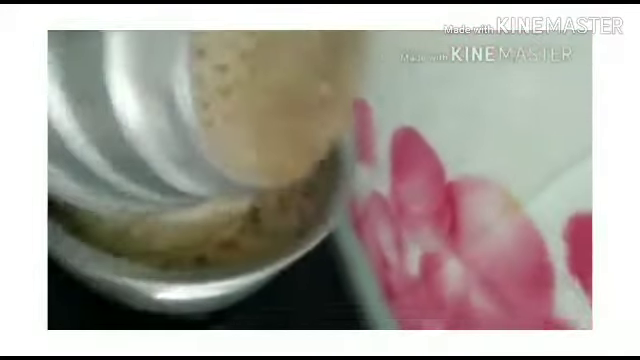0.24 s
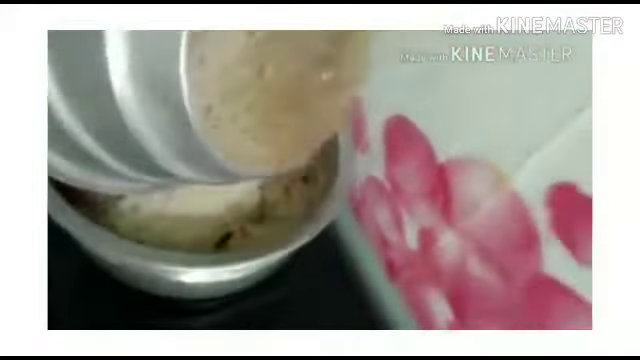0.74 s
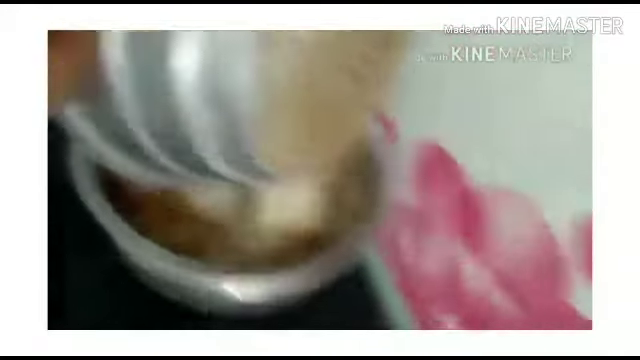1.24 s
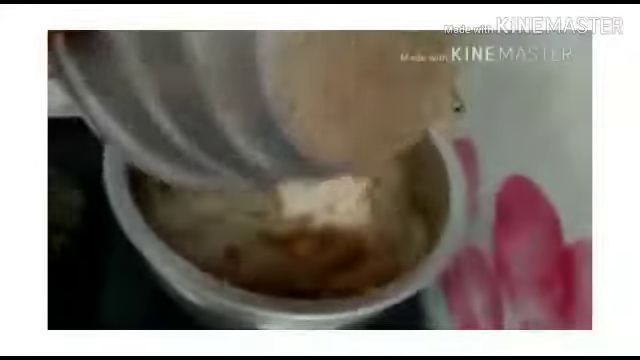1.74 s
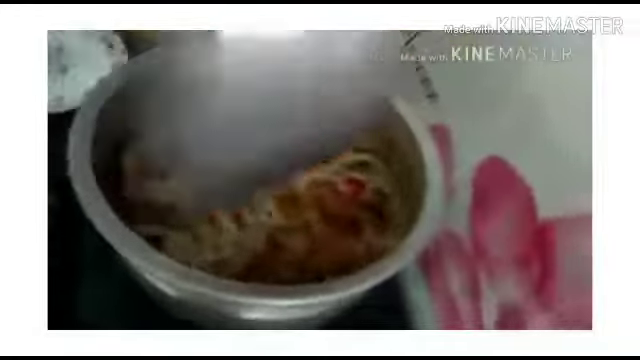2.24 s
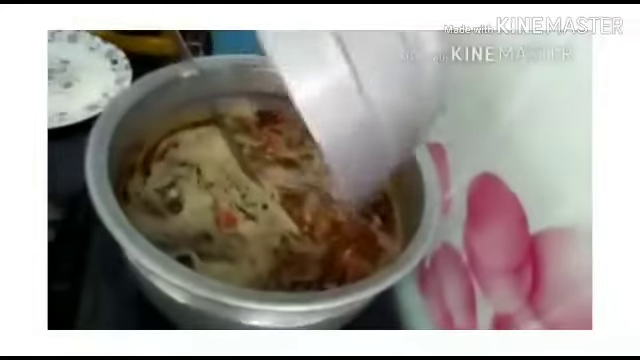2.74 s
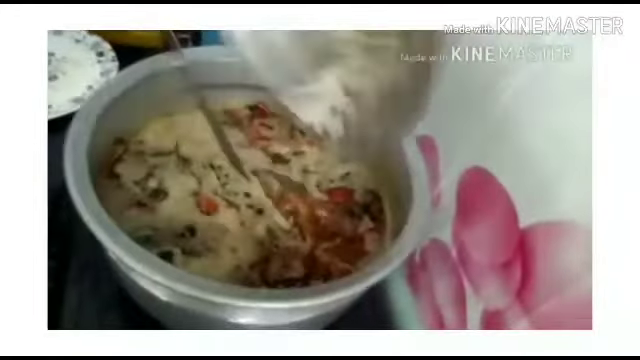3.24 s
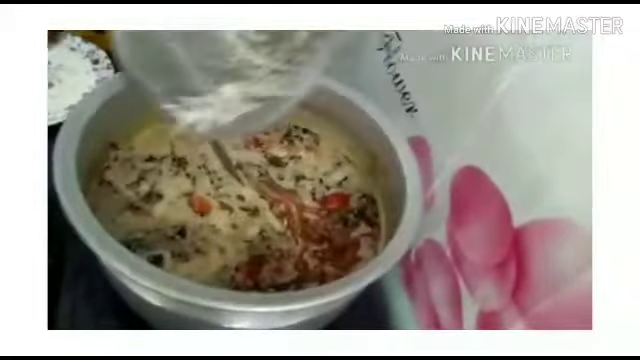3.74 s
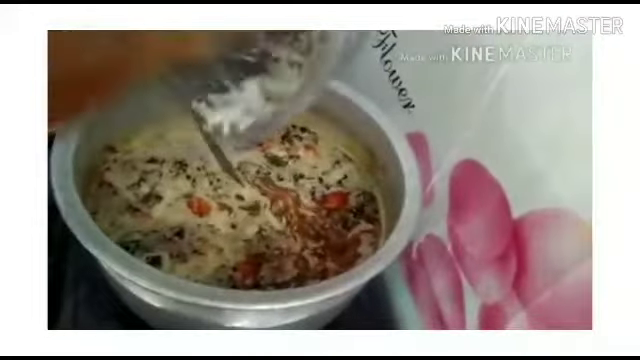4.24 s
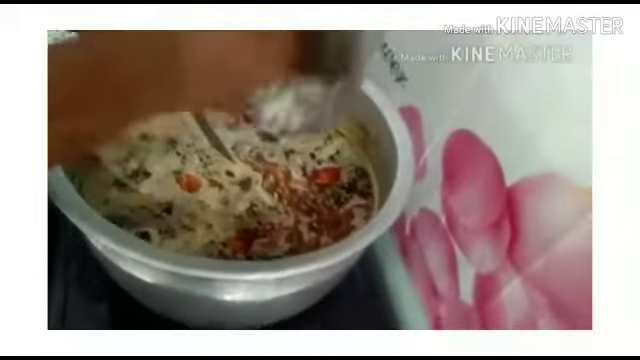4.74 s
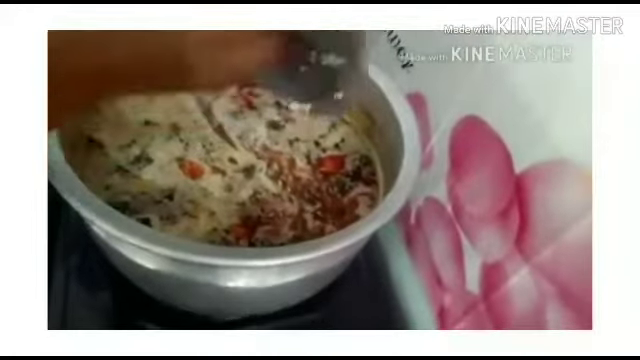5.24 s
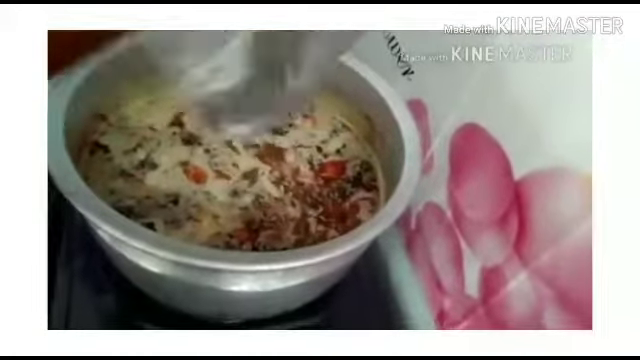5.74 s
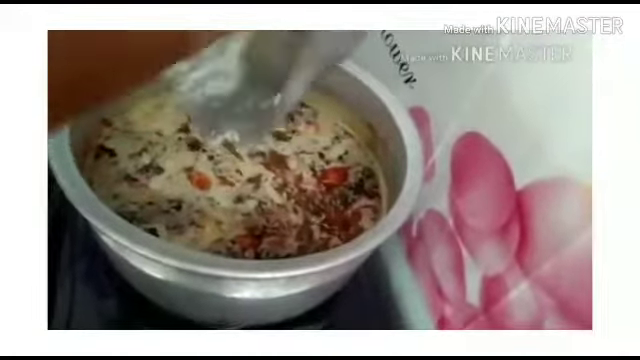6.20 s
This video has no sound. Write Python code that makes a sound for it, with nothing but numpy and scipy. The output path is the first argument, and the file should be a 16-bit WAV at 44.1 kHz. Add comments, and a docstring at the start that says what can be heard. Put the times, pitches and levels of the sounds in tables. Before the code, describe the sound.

In a small hard-walled kitchen, very close, wet rice hisses down a tub while the tub knocks twice on a metal pot. Rice slumps into broth with soft, hollow, wavering booms and a short scrape. Four loud clanking knocks follow with bursts of sliding rice. After a near-quiet pause come light finger taps, grain ticks and hand sweeps. A phone microphone picks it up, brighter on the right, over a faint simmering rush.

```python
"""In a small kitchen, close to a phone, soaked rice is emptied from a tub into an aluminium pot of hot broth.
Knocks on the rim are bursts of contact noise played through resonances of the tub and the pot.
Sliding rice, a scrape and a hand's sweeps are dense random clicks, coloured as hiss and rasp, with drifting echoes.
Slumps into the broth are soft click noise and slowly wavering resonances; fizz and a faint rush lie behind.
The right microphone faces the pot; the left one is shaded and hears it duller."""
import sys
import numpy as np
from scipy import signal
from scipy.fft import rfft, irfft
from scipy.io import wavfile
from scipy.ndimage import uniform_filter1d

SR = 44100
rng = np.random.default_rng(int(sys.argv[2]) if len(sys.argv) > 2 else 0)


def int16_out(signal):
    """Quantize to a 16-bit WAV file."""
    q = np.round(np.clip(np.atleast_2d(signal).T, -1, 1) * 32767)
    wavfile.write(sys.argv[1], SR, q.astype(np.int16))


N = 285327
TIME = np.arange(N) / SR


def undb(db):
    """Decibels to gain."""
    return 10 ** (np.asarray(db) / 20)


def unit(x):
    """Scale to an rms of 1."""
    return x / np.sqrt(np.mean(x ** 2))


def norm(x):
    """Scale a response to an energy of 1."""
    return x / np.sqrt(np.sum(x ** 2, axis=-1, keepdims=True))


def add(out, s, x):
    """Mix x in at time s."""
    i = max(int(s * SR), 0)
    out[..., i:i + x.shape[-1]] += x[..., :N - i]


def through(x, response):
    """Play x through a response; rows are microphones."""
    return signal.fftconvolve(np.atleast_2d(x), np.atleast_2d(response), axes=-1)[:, :N]


def butter(x, order, hz, kind):
    """Butterworth filter."""
    return signal.sosfilt(signal.butter(order, hz, kind, fs=SR, output="sos"), x)


def band(x, low_hz, high_hz, order=3):
    """Steep band-pass."""
    return butter(x, order, [low_hz, min(high_hz, SR / 2 - 1)], "band")


def colour(points, size=4096):
    """Causal response with the given spectrum, points of (pitch_hz, level_db)."""
    hz, db = np.transpose(points)
    f = np.maximum(np.fft.rfftfreq(size, 1 / SR), 1)
    level_db = np.interp(np.log(f), np.log(hz), db)
    # folding the cepstrum onto positive times gives minimum phase
    cepstrum = irfft(np.log(undb(level_db)))
    cepstrum[1:size // 2] *= 2
    cepstrum[size // 2 + 1:] = 0
    return irfft(np.exp(rfft(cepstrum)))


def fade(t, t60):
    """Exponential decay that loses 60 dB in t60 seconds."""
    return np.exp(-np.log(1000) * t / t60)


def swell(start_s, hold_s, attack_s, release_s):
    """Rise before start_s, hold, fall; the slopes are timed over 20 dB."""
    before = np.maximum(start_s - TIME, 0) / attack_s
    after = np.maximum(TIME - start_s - hold_s, 0) / release_s
    return undb(-20 * (before + after))


def together(gains):
    """Joint gain of unrelated noises: their powers add."""
    return np.sqrt(sum(g ** 2 for g in gains))


def walk(rate):
    """Smooth chance with a spread near 1, rate new values per second."""
    knots = rng.standard_normal(int(N / SR * rate) + 2)
    return np.interp(TIME * rate, np.arange(len(knots)), knots)


def grains(rate, spread_db, apart):
    """Dense clicks of uneven size; each reaches the two microphones with its own strength."""
    size = undb(spread_db * np.minimum(rng.exponential(size=N), 5))
    clicks = (rng.random(N) < rate / SR) * size
    return unit(clicks * (rng.standard_normal(N) + apart * rng.standard_normal((2, N))))


def chatter(apart=0.79, size=4096):
    """Micro-contacts, random in time, even in spectrum; each microphone adds its own part above the bass."""
    x = irfft(np.exp(2j * np.pi * rng.random((3, size // 2 + 1))))
    own = butter(x[1:], 1, 600, "high")
    return unit(x[0] + apart * own)


# spectrum of the faint rush in the kitchen: pitch_hz [Hz], level_db [dB, relative]
RUSH_SPECTRUM = [(30, 6.5), (110, 1.5), (300, 0), (420, -8.5), (520, 5), (700, -6.5), (1050, -8),
                 (2000, -16.5), (5000, -21), (8500, -16.5), (15000, -29.5)]
KITCHEN_DB = -65.5


def kitchen():
    """Faint rush of the stove and the simmering pot: coloured noise whose level strays a little."""
    noise = rng.standard_normal(N) + .8 * rng.standard_normal((2, N))
    air = through(noise, norm(colour(RUSH_SPECTRUM)))
    return unit(air) * undb(KITCHEN_DB + 1.2 * walk(3.4))


def room(x, t60=0.37, build_s=0.0075, shared_hz=600):
    """Dense reflections of close hard walls: decaying noise; both microphones get the same bass."""
    t = TIME[:SR // 2]
    noise = rng.standard_normal((2, len(t)))
    bass = signal.sosfiltfilt(signal.butter(2, shared_hz, fs=SR, output="sos"), noise)
    reflections = noise - bass + bass[1]
    tail = norm(reflections * fade(t, t60) * (1 - np.exp(-t / build_s)))
    walls = [(100, 6), (300, 0.5), (700, 4.0), (1200, 6.0), (3500, -10.5), (8000, -4.0), (15000, -7.5)]
    return through(through(x, tail), colour(walls))


# the grip shifts: start_s [s, start of the hold], hold_s [s], level_db [dB]
GRIP_SHIFTS = [(0.571, 0.21, -56.5), (5.56, 0.055, -61.5)]


def handling(attack_s=.08, release_s=0.27):
    """Dull rumble as the grip shifts: noise with little left above the bass."""
    dull = colour([(25, -3.5), (60, -5), (90, -1.5), (200, -27), (600, -52)])
    rumble = through(rng.standard_normal((2, N)), dull)
    return unit(rumble) * together(undb(db) * swell(s, hold, attack_s, release_s) for s, hold, db in GRIP_SHIFTS)


# wet rice meets the hot broth: start_s [s, start of the hold], hold_s [s], level_db [dB, before a common trim]
FIZZES = [(0.756, 0.0083, -30), (1.43, .43, -47)]


def fizz(attack_s=0.06, release_s=.05):
    """Tiny bubbles bursting on the hot surface: dense clicks in a high band."""
    bubbles = band(grains(rate=6000, spread_db=2, apart=1), 12000, 15000, order=2)
    bursting = together(undb(db) * swell(s, hold, attack_s, release_s) for s, hold, db in FIZZES)
    return undb(-7.5) * unit(bubbles) * bursting


def wavering(hz, width_hz):
    """A resonance stirred at random: strength and phase stray, the faster the wider it is."""
    phase = 2 * np.pi * np.cumsum(hz * np.ones(N)) / SR
    clock = np.cumsum(width_hz * np.ones(N)) / SR
    a, b = (np.interp(clock, np.arange(len(k)), k) for k in rng.standard_normal(size=(2, 4096)))
    return unit(a * np.cos(phase) + b * np.sin(phase))


# tub knocked on the rim: start_s [s, the blow], blow_db [dB], rebound_db [dB re blow],
# scuff_db [dB re blow, before it], bass_db [dB, the thump], brightness_db [dB at 8 kHz], room_db [dB, room send]
RIM_KNOCKS = [(0.1239, -9.5, -17.5, -11, 1.5, -8, -14.5), (0.3091, -7, -24.5, -25, -5.5, 3.5, -12.5),
              (1.889, -12, -17.5, -14, -12.5, -2.5, -0.5), (2.597, -4.5, -16.5, -9, -4, 0.5, 3),
              (2.829, -7.5, -17.5, -22, -3, 3, 1.5), (3.0216, -6.5, -9.5, -11, -3, -2, -1),
              (3.2242, -6, -18, -40, -7, 1, -4)]
# masses of rice slump into the broth: start_s [s, start of the hold], hold_s [s],
# boom_db [dB], slosh_db [dB], both before the trims in slump()
RICE_SLUMPS = [(1.337, 0.037, -52.5, -52), (1.38, 0.046, -46, -48.5), (1.809, 0.056, -45, -65),
               (1.885, .17, -40, -46), (2.141, 0.16, -42.5, -58.5), (2.44, 0.25, -48.5, -58.5)]
# pitch of the air between tub and pot: start_s [s], pitch_hz [Hz]
AIR_PITCH = [(1.32, 340), (1.42, 265), (1.8, 200), (1.9, 251.8), (2.06, 254.9), (2.18, 285), (2.4, 292),
             (2.7, 270)]
# the boom gets purer as the tub empties: start_s [s], width_hz [Hz]
AIR_WIDTH = [(1.4, 155.3), (1.8, 59.9), (2.5, 60.47), (2.72, 21.8)]
# spectrum of the slosh: pitch_hz [Hz], level_db [dB, relative]
SLOSH_SPECTRUM = [(40, -32), (130, -7.5), (220, 4), (380, 2.5), (520, -3.5), (750, -11), (1050, -6.5),
                  (1400, -19.5), (2600, -22), (8000, -33.5)]
SLUMP_ATTACK_S, SLUMP_RELEASE_S = 0.055, 0.16  # time to rise and to fall by 20 dB
FILLED_S = 2.5  # knocks after this make the air boom too
KNOCK_BOOM_DB = -36  # relative to the blow, before the trim in slump()
KNOCK_BOOM_HOLD_S, KNOCK_BOOM_ATTACK_S, KNOCK_BOOM_RELEASE_S = .1, .02, .11
# a deeper resonance of the broth, stirred only by the slumps; its level is relative to the boom
LOW_BOOM_HZ, LOW_BOOM_WIDTH_HZ, LOW_BOOM_DB = 188, 27, -8.5


def slump():
    """Rice sinks into the broth with a soft slosh; the air between tub and pot booms at a wavering pitch."""
    falls = [(swell(s, hold, SLUMP_ATTACK_S, SLUMP_RELEASE_S), boom_db, slosh_db)
             for s, hold, boom_db, slosh_db in RICE_SLUMPS]
    stirred = together(shape * undb(db) for shape, db, _ in falls)
    sloshing = together(shape * undb(db) for shape, _, db in falls)
    knocked = together(
        undb(db + KNOCK_BOOM_DB) * swell(s, KNOCK_BOOM_HOLD_S, KNOCK_BOOM_ATTACK_S, KNOCK_BOOM_RELEASE_S)
        for s, db, *_ in RIM_KNOCKS if s > FILLED_S)
    pitch_hz = np.interp(TIME, *np.transpose(AIR_PITCH))
    width_hz = np.interp(TIME, *np.transpose(AIR_WIDTH))
    boom = wavering(pitch_hz, width_hz) * together([stirred, knocked])
    low_boom = undb(LOW_BOOM_DB) * wavering(LOW_BOOM_HZ, LOW_BOOM_WIDTH_HZ) * stirred
    slosh = through(grains(rate=2600, spread_db=0.0, apart=0.3), norm(colour(SLOSH_SPECTRUM)))
    return undb(3.0) * (boom + low_boom) + undb(5.5) * slosh * sloshing


# single grains and clumps snap against the wall: start_s [s, the sharp onset], level_db [dB], pitch_hz [Hz, centre]
GRAIN_SNAPS = [(0.21, -24, 8540), (0.5422, -34, 8240), (0.579, -41.5, 7100), (0.601, -39, 7140),
               (3.5407, -19.5, 7700), (3.6137, -34.5, 8960), (4.12, -40.5, 8180), (4.192, -49, 8800),
               (4.9166, -25.5, 8350), (5.059, -37.5, 8100), (5.076, -33, 8100), (5.399, -30, 8200),
               (5.5, -32.5, 8700), (5.575, -34, 8170), (6.196, -31.5, 8450), (6.228, -27, 9000),
               (6.241, -25, 9000), (6.348, -32.5, 8400), (6.4275, -29, 8450)]


def ticks(width_hz=4000, contact_s=0.0073):
    """Tiny bright snaps, each a quick cluster of contacts in a high band."""
    out = np.zeros((2, N))
    t = TIME[:4096]
    for s, db, hz in GRAIN_SNAPS:
        cluster = chatter() * np.exp(-(t / contact_s) ** 2)
        snap = band(cluster, hz - width_hz / 2, hz + width_hz / 2, order=3)
        add(out, s, undb(db) * norm(snap) * np.sqrt(contact_s * SR / 2))
    return out


def drifting_echoes(x, lag_s, sway, echo, count=3):
    """Short echoes with drifting delays, so peaks and notches wander through the hiss and rasp."""
    out = x
    for k in range(count):
        at = TIME - lag_s * (k + 1) / 2 * np.exp(sway * walk(5))
        delayed = np.array([np.interp(at, TIME, side) for side in x])
        out = out + (-1) ** (k + 1) * echo * delayed
    return unit(out)


# rice slides down the tub wall, the tub scrapes the rim (1.953), an earlier knock dies away (0):
# start_s [s, start of the hold], hold_s [s], hiss_db [dB], rasp_db [dB], both before the trims in rice()
SLIDES_AND_SCRAPE = [(0, 0.033, -28.5, -27), (0.125, 0.081, -26, -27), (0.244, .005, -35, -54.5),
                     (0.36, 0.027, -28.5, -26), (0.435, .035, -33.5, -43), (.755, 0.021, -45.5, -69),
                     (0.85, 0.1, -55.5, -73), (1.45, 0.16, -45, -59.5), (1.674, .17, -63, -72),
                     (1.953, 0.12, -56, -37), (2.459, .005, -55, -58.5), (2.51, .05, -74.5, -63.5),
                     (2.635, 0.025, -31.5, -30.5), (2.697, .06, -21, -28), (2.868, 0.024, -30.5, -23),
                     (3.072, 0.026, -33.5, -28), (3.279, 0.053, -33, -33)]
# strokes of the hand through the tub; the faint rustle at 5.937 trails a finger tap:
# middle_s [s], length_s [s, between the 1/e points], hiss_db [dB], rasp_db [dB], both before the trims in rice()
HAND_RUSTLES = [(4.203, 0.14, -53, -54.5), (4.34, 0.14, -52, -50), (4.442, 0.16, -31.5, -48),
                (4.738, 0.05, -38.5, -52), (4.762, 0.04, -43.5, -55), (4.903, 0.19, -34.5, -51),
                (5.19, 0.14, -43, -47), (5.321, 0.15, -34.5, -47.5), (5.505, 0.25, -44.5, -60),
                (5.688, 0.13, -34, -47), (5.937, 0.059, -50.5, -60), (6.047, 0.092, -44, -53.5),
                (6.152, 0.13, -38, -48), (6.234, 0.13, -37, -73), (6.4, 0.077, -40.5, -54)]
# spectra of the hiss and of the rasp: pitch_hz [Hz], level_db [dB, relative]
HISS_SPECTRUM = [(100, -34), (1200, -47), (3000, -20.5), (5000, -12.5), (6500, -7), (8200, -2),
                 (9600, -4.5), (11500, -9), (15000, -18)]
RASP_SPECTRUM = [(40, -8.5), (120, 5.5), (300, 5), (650, -16.5), (1100, -8), (1700, -1), (2300, -1.5),
                 (3300, 4), (4500, -5), (7000, -10.5), (15000, -23.5)]
SLIDE_ATTACK_S, SLIDE_RELEASE_S = 0.077, 0.054  # time to rise and to fall by 20 dB
RUSTLE_SHAPE = 1.59  # 1 = pointed swell, 2 = round
CLUMP_DB = -9  # coarse grains among the fine ones


def rice():
    """Contacts hiss and rasp in small slips: mostly rice sliding or swept by the hand, also the rim scrape."""
    moves = [(swell(s, hold, SLIDE_ATTACK_S, SLIDE_RELEASE_S), hiss_db, rasp_db)
             for s, hold, hiss_db, rasp_db in SLIDES_AND_SCRAPE]
    moves += [(np.exp(-np.abs(2 * (TIME - s) / length) ** RUSTLE_SHAPE), hiss_db, rasp_db)
              for s, length, hiss_db, rasp_db in HAND_RUSTLES]
    hissing = together(shape * undb(db) for shape, db, _ in moves)
    rasping = together(shape * undb(db) for shape, _, db in moves)
    slips = undb(1.8 * walk(70))
    fine = grains(rate=10000, spread_db=1, apart=3.3)
    coarse = grains(rate=220, spread_db=2, apart=3.3)
    hiss = through(fine + undb(CLUMP_DB) * coarse, norm(colour(HISS_SPECTRUM)))
    hiss = drifting_echoes(hiss, lag_s=.0007, sway=.3, echo=.55)
    rasp = through(grains(rate=2500, spread_db=0.5, apart=0.96), norm(colour(RASP_SPECTRUM)))
    rasp = drifting_echoes(rasp, lag_s=.0013, sway=0.28, echo=.75)
    return slips * (undb(1.0) * hiss * hissing + undb(-4.0) * rasp * rasping)


# quickly damped resonances of the tub wall: pitch_hz [Hz, nominal], width_hz [Hz], level_db [dB, relative]
TUB_MODES = [(117, 190, 1), (360, 49, 2.5), (925, 260, -7), (1480, 200, -9.5), (2031, 90, 3.5),
             (2480, 280, -6), (2940, 190, 0.5), (3340, 320, -1.5), (4427, 43, -7), (5850, 46, -20.5),
             (7260, 38, -5.5), (6980, 280, -7), (9200, 400, -12.5), (8910, 180, -3)]


def tub_wall(size=4096, grip=0.02):
    """Short hollow response of the tub; grip and load shift its resonances from blow to blow."""
    t = TIME[:size]
    shifts = 1 + grip * rng.standard_normal(len(TUB_MODES))
    response = 0
    for k, (hz, width, db) in enumerate(TUB_MODES):
        damping = width * np.exp(-np.pi * width * t)
        # neighbouring modes alternate in polarity
        response = response + undb(db) * damping * np.sin(2 * np.pi * hz * shifts[k] * t + k * np.pi)
    return norm(response)


# the filled pot rings on: pitch_hz [Hz, nominal], level_db [dB, relative, nominal], t60_s [s]
POT_MODES = [(104.3, -5.5, 0.35), (151.9, -5, 0.5), (268.2, -3.5, 0.46), (392, -11.5, 0.2),
             (523, -13.5, 0.36), (784, -11, .1), (1033.8, -4.5, 0.15), (1410, -14, 0.11), (1554, -12, 0.1),
             (1770, -4.5, 0.13), (1897, -5.5, .13), (1964, -4.5, 0.086), (2183, -4.5, 0.15),
             (2430, -7, 0.1), (2630, 0.5, 0.038), (2877, -2.5, 0.038), (3400, -2, 0.21), (3680, -2.5, 0.15),
             (3895, -5, .13), (4390, -3, 0.12), (5800, -7.5, 0.24), (7440, -9, .22), (8312, -8, 0.2)]


def pot_ring(vary_db=2.0, detune=.008):
    """Longer ring of the pot's modes; their mix and tuning depend on where the tub presses on the rim."""
    t = TIME[:SR // 2]
    chance = rng.standard_normal((len(POT_MODES), 3))
    ring = 0
    for (hz, db, t60), (size, turn, shift) in zip(POT_MODES, chance):
        tone = np.sin(2 * np.pi * (hz * (1 + detune * shift) * t + turn))
        ring = ring + undb(db + vary_db * size) * fade(t, t60) * tone
    return norm(ring)


# a hard contact's own spectrum: pitch_hz [Hz], level_db [dB, relative]
CRACK_SPECTRUM = [(30, -25.5), (70, -13.5), (120, -7.5), (380, -9.5), (540, -10.5), (800, -14.5),
                  (1150, -1.5), (2000, 0), (4300, 7.5), (5200, 4), (7000, 5.5), (9500, 2), (11500, -5),
                  (15000, -12.5)]


def strike(push, low_hz=85):
    """A push sounds the contact's crack, the tub wall and the pot; such small bodies radiate no deep bass."""
    body = undb(-7) * pot_ring()
    add(body, 0, undb(0.5) * tub_wall() + undb(2.0) * norm(colour(CRACK_SPECTRUM)))
    return through(push, butter(body, 2, low_hz, "high"))


# fingers tapping the tub: start_s [s], level_db [dB, of the push]
FINGER_TAPS = [(4.103, -46), (4.12, -44), (4.706, -52), (5.892, -38.5)]


def taps():
    """Fingers touch the tub: fading contact chatter without bass sounds the same bodies as a knock."""
    out = np.zeros((2, N))
    for s, db in FINGER_TAPS:
        touch = undb(db) * fade(TIME[:4096], 0.067) * chatter()
        add(out, s, strike(butter(touch, 1, 950, "high")))
    return out


# plays RIM_KNOCKS, listed above slump()
def knocks(contact_s=.0058, rebound_s=.021, rebound_width_s=0.017, scuff_s=0.004, thump_db=22, thump_hz=480):
    """The tub scuffs the rim, thumps, buzzes for a few ms and rebounds; returns the sound and its room send."""
    out, send = np.zeros((2, 2, N))
    lead = .03  # s of scuff before the blow
    t = TIME[:4096] - lead
    # the tub's weight gives one smooth push; the chatter of the contact carries everything above it
    thump = undb(thump_db) * butter(signal.unit_impulse(len(t), int(lead * SR)), 2, thump_hz, "low")
    for s, db, rebound_db, scuff_db, bass_db, bright_db, room_db in RIM_KNOCKS:
        scuff = undb(scuff_db) * np.exp(-np.abs(t) / scuff_s)
        blow = np.where(t >= 0, np.exp(-(t / contact_s) ** 2), scuff)
        rebound = undb(rebound_db) * np.exp(-((t - rebound_s) / rebound_width_s) ** 2)
        buzz = butter((blow + rebound) * chatter(), 2, thump_hz, "high")
        push = undb(db) * (buzz + undb(bass_db) * thump)
        knock = strike(through(push, colour([(2500, 0.0017), (8000, bright_db)])))
        add(out, s - lead, knock)
        add(send, s - lead, knock * undb(room_db))
    return out, send


# how the left microphone hears the pot from behind the phone: pitch_hz [Hz], level_db [dB]
LEFT_SHADE = [(60, -5.5), (250, -6), (700, -11.5), (1300, -7.5), (2300, -1.5), (4400, -6.5), (6000, -11),
              (8200, -22.5), (15000, -19)]


def scene():
    """All sources in the kitchen, as they reach the two microphones."""
    background = kitchen() + handling() + slump()
    grain = ticks() + rice() + fizz()
    tapping = taps()
    blows, send = knocks()
    close = blows + tapping + grain
    reflected = undb(-5.5) * room(send + tapping) + undb(-11.5) * room(grain)
    mix = background + close + reflected
    # the left microphone lies behind the phone's body: 3 samples later and duller
    left = np.roll(through(mix[0], colour(LEFT_SHADE))[0], 3)
    return np.array([left, mix[1]])


TOP_HZ = 15100


def record(dry, threshold_db=-62, depth_db=-6):
    """The phone turns down quiet moments, thins the deepest bass, rounds the loudest peaks and cuts the top."""
    power = np.abs(uniform_filter1d(np.mean(dry ** 2, axis=0), size=1024))
    ducked = dry * undb(depth_db / (1 + power / undb(threshold_db) ** 2))
    thinned = butter(ducked, 1, 45, "high")
    rounded = .82 * np.tanh(thinned / .82)
    return signal.sosfilt(signal.ellip(10, .1, 80, TOP_HZ, fs=SR, output="sos"), rounded)


dry = scene()
out = record(dry)
int16_out(out)
```